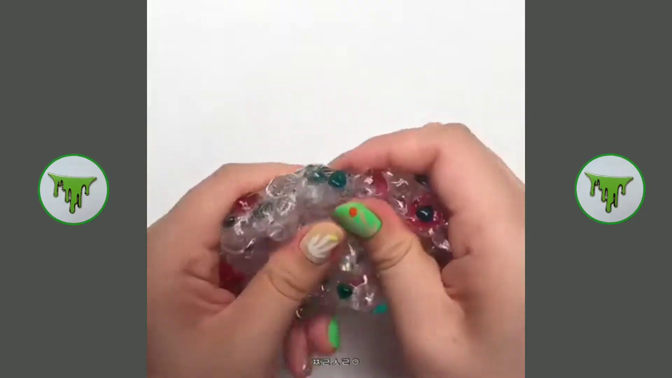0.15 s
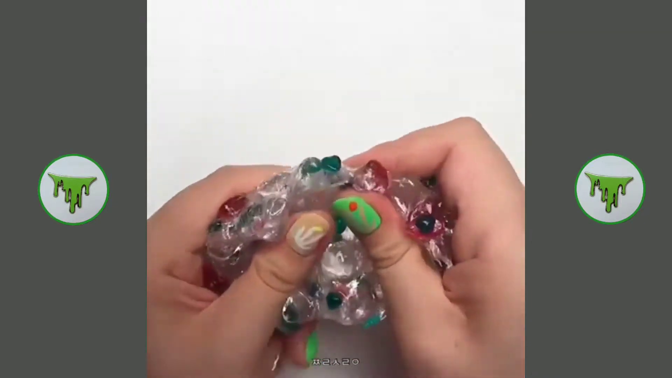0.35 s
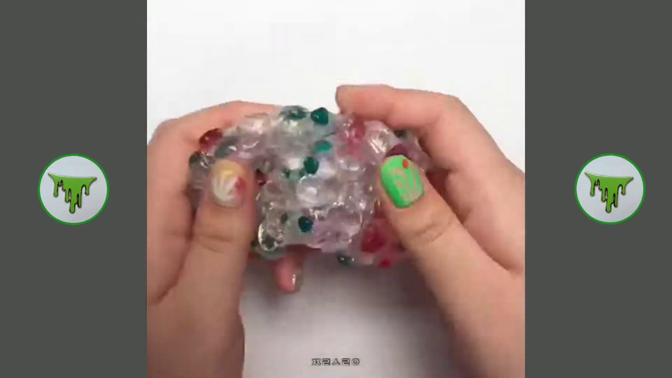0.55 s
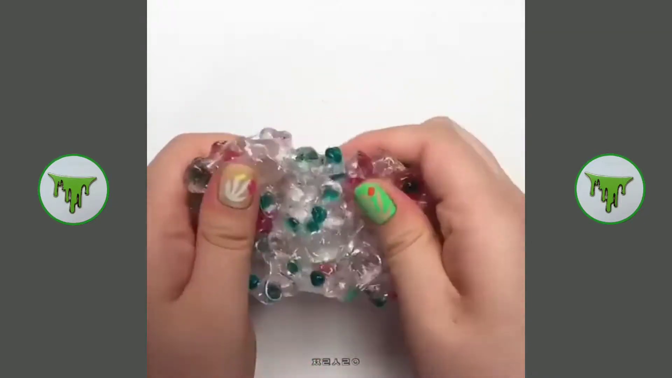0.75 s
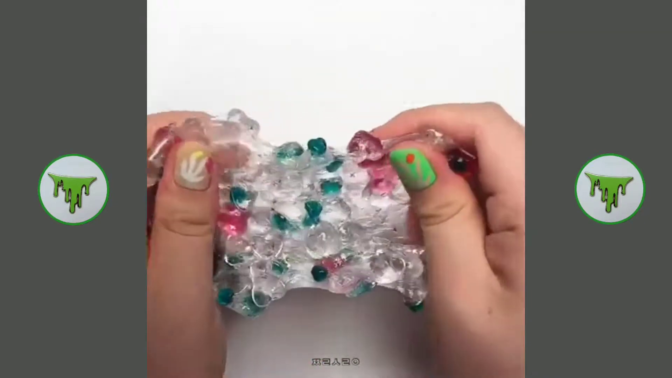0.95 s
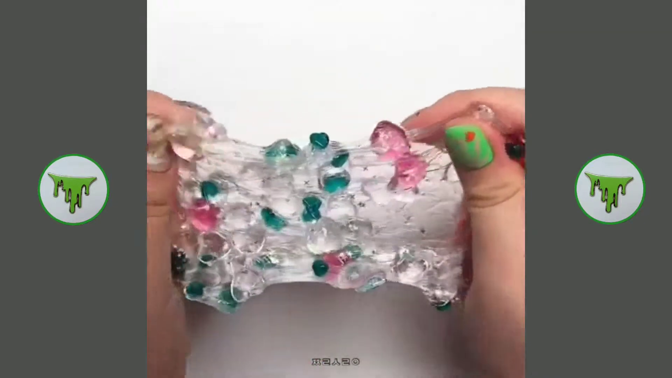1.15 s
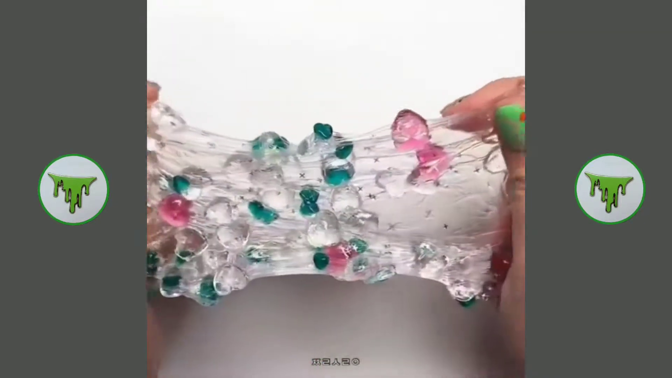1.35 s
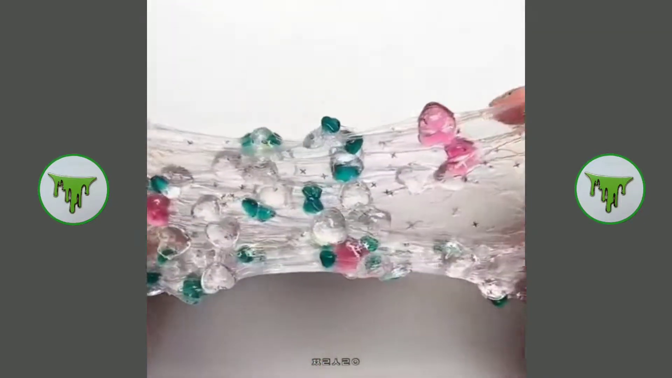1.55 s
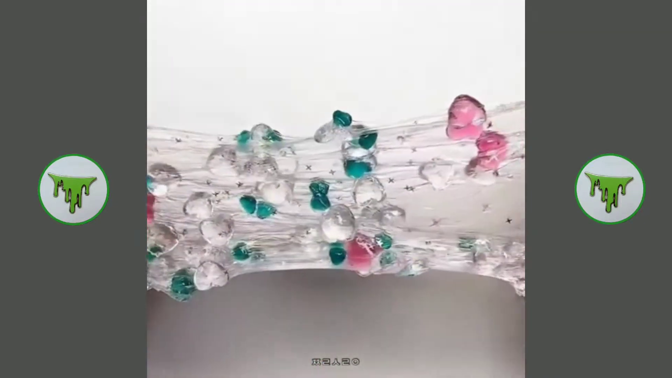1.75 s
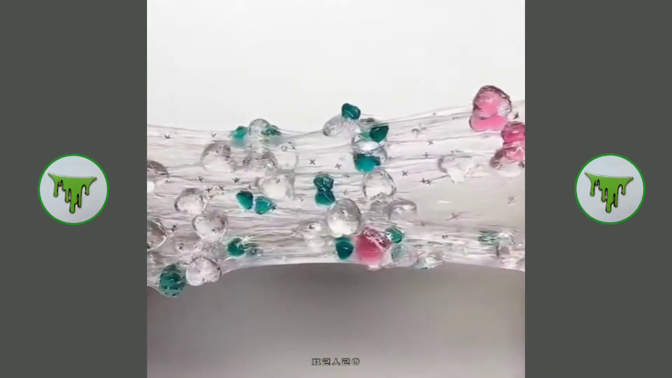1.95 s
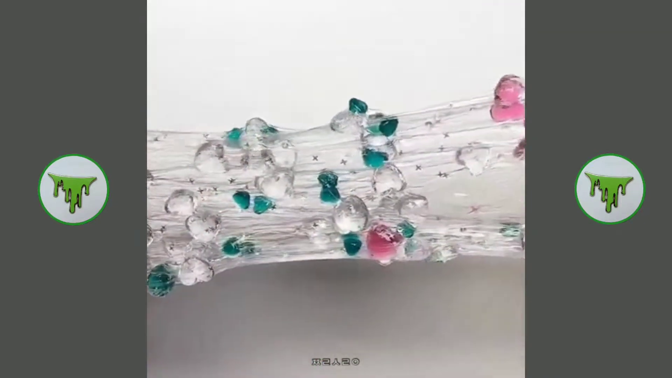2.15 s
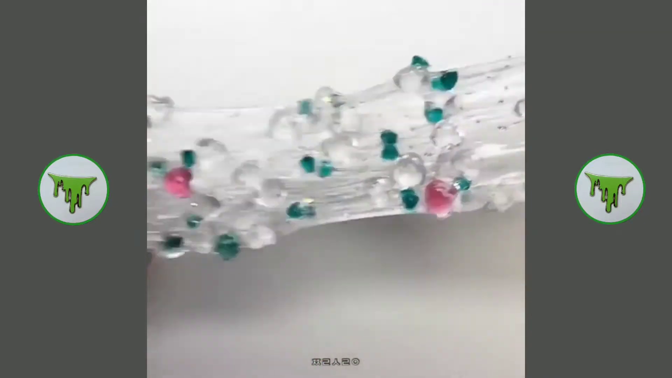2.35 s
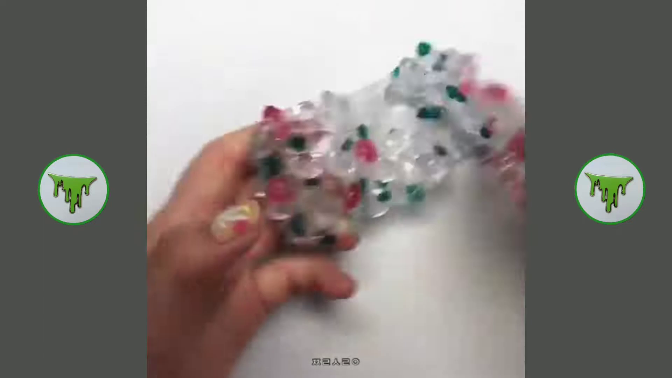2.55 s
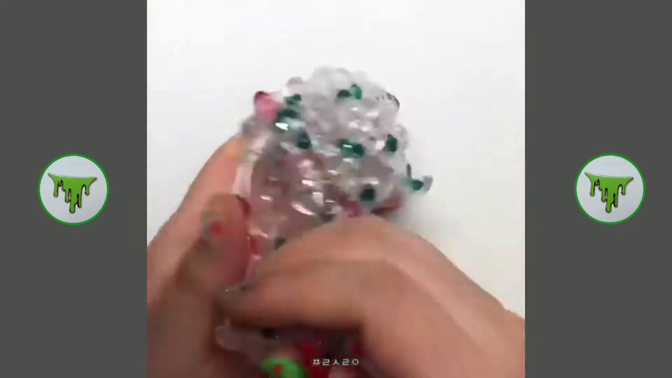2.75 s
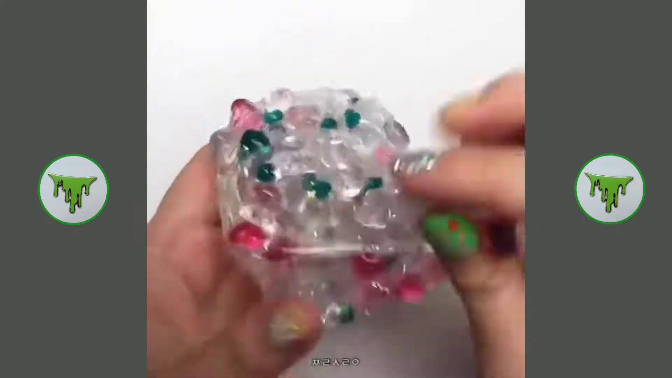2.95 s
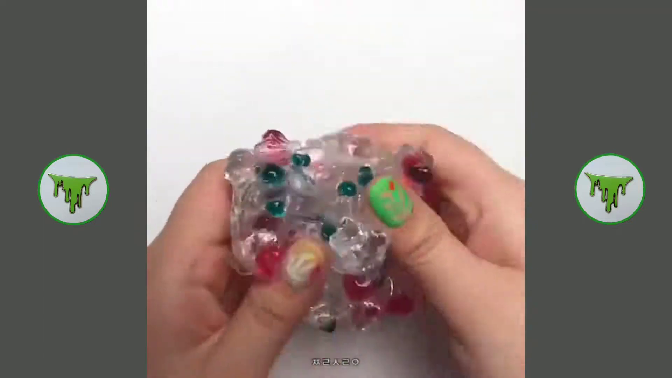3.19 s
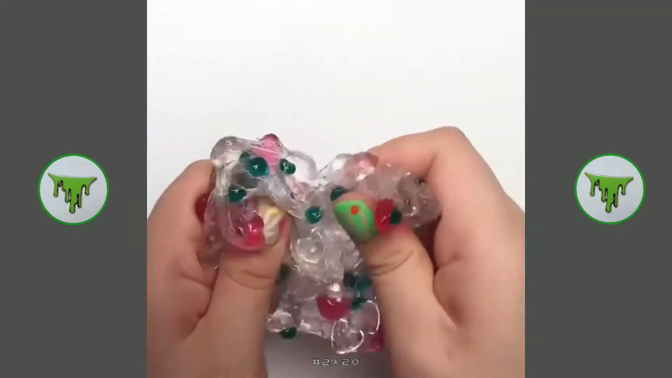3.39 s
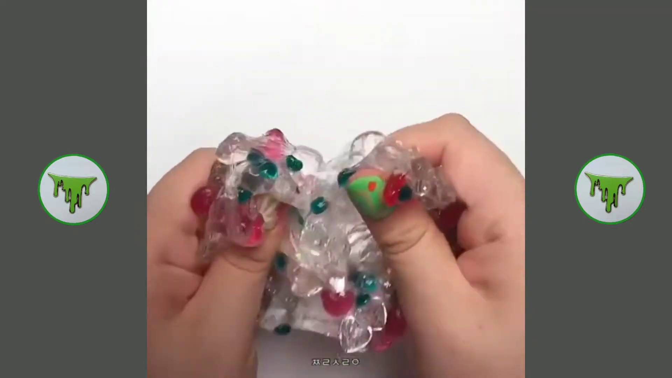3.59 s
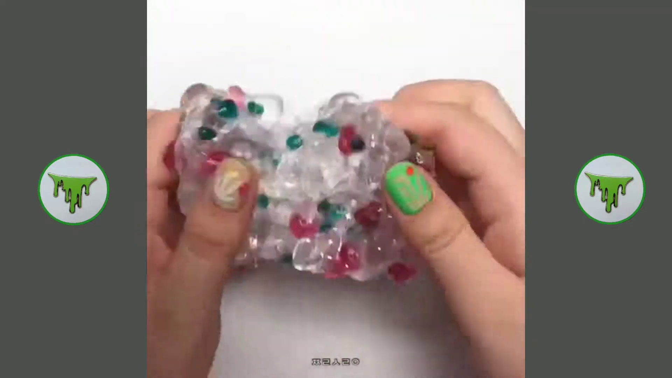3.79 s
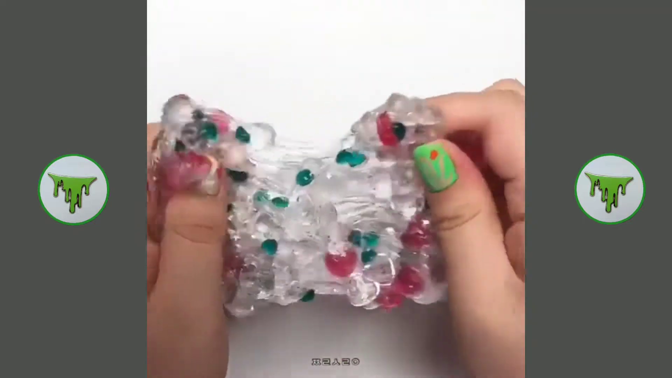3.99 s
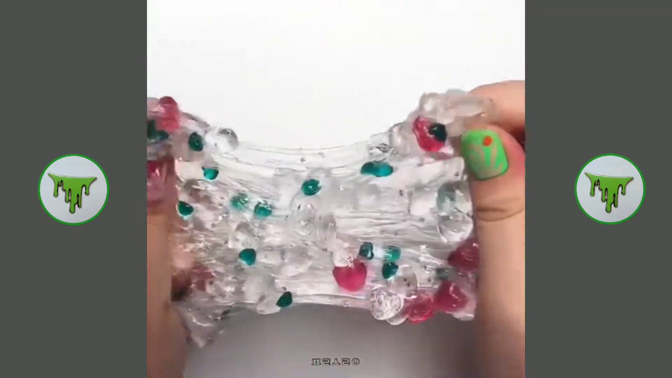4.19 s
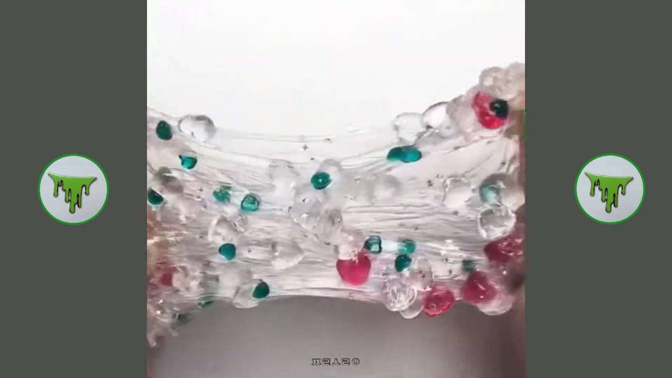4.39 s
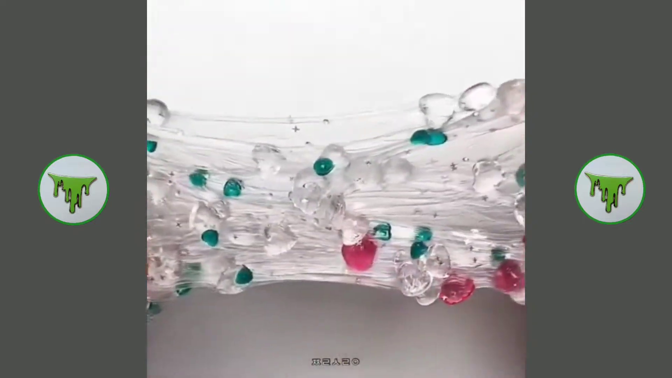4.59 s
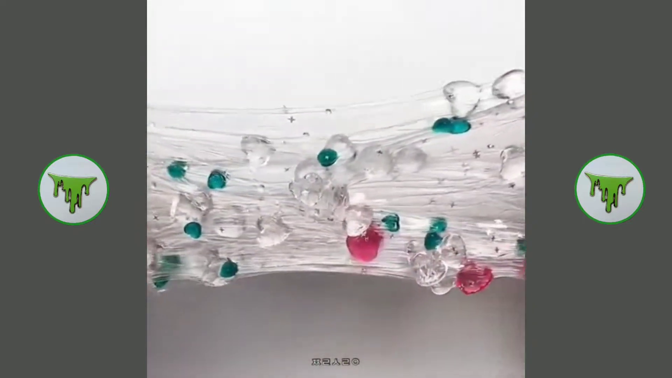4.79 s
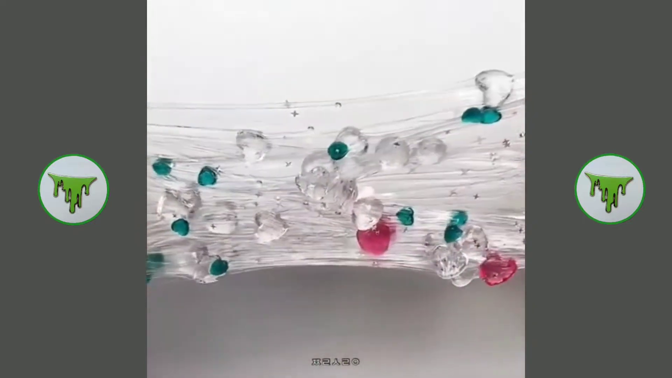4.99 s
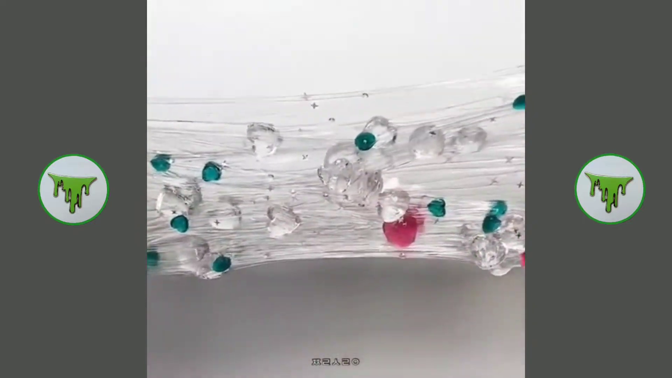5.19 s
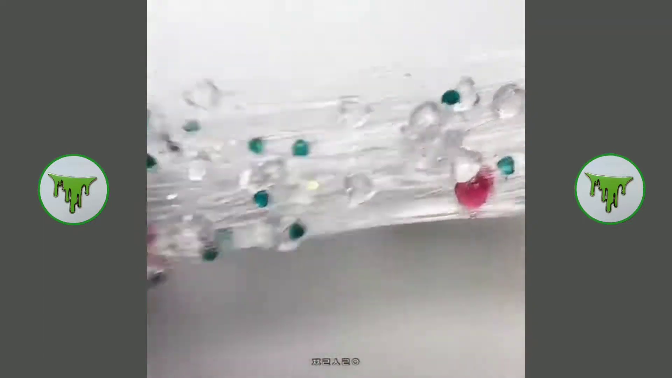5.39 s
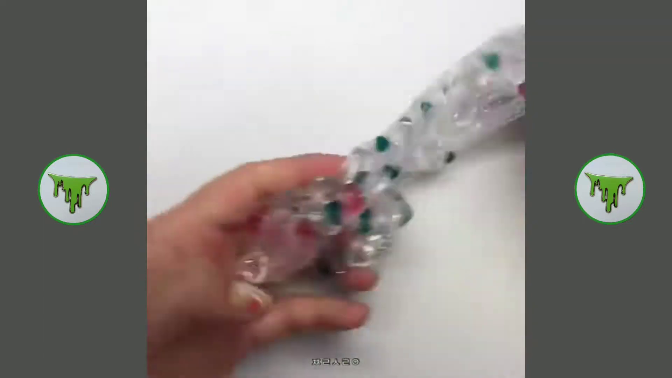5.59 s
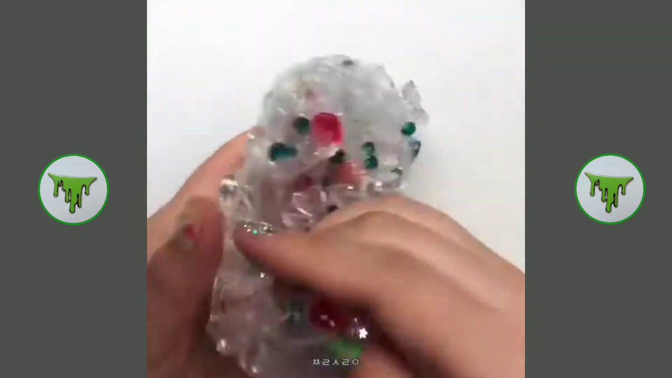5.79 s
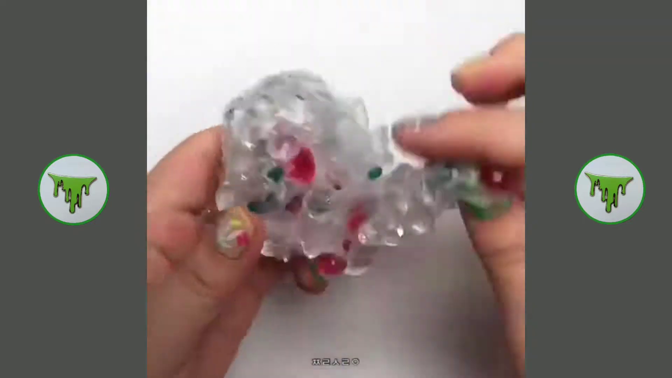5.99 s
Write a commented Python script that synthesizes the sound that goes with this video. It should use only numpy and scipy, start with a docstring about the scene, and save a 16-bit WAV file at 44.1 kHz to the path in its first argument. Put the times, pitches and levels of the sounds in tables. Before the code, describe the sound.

Close wet slime crackling: clusters of crisp, high popping bubbles and squishy fizz, quieter during stretches, then kneaded again, with faint table thumps.

```python
"""Short pitched pops burst out at once, as hands squeeze and stretch wet slime full of gel beads.
Each pop is a few fading tones; between them, coloured noise and swarms of tiny bubbles hiss and crackle.
The lump and the wrists thump the table now and then, which rings in low tones.
Behind it all are short echoes, a faint long room tail near 2 kHz after one burst, made of narrow noise,
and the soft air and hum of a quiet room. A faint, unrelated side layer wavers in the treble."""
import sys
import numpy as np
from scipy import signal
from scipy.fft import rfft, irfft, next_fast_len
from scipy.io import wavfile
from scipy.ndimage import uniform_filter1d, map_coordinates

SR = 44100
rng = np.random.default_rng(int(sys.argv[2]) if len(sys.argv) > 2 else 0)


def master_out(mix):
    """Clip the mix to full scale and print it as 16-bit PCM to the path in sys.argv[1]."""
    frames = np.transpose(np.atleast_2d(mix))
    ceiling = np.clip(frames, -1, 1)
    pcm = np.round(ceiling * 32767).astype(np.int16)
    wavfile.write(sys.argv[1], SR, pcm)


N = 266364  # length in samples, about 6 s


def amp(db):
    """Turn a level in dB into a gain."""
    return 10 ** (np.asarray(db) / 20)


def unit(x):
    """Scale x to an rms of 1."""
    return x / np.sqrt(np.mean(x ** 2) + 1e-20)


def along(points, hz):
    """Read a curve of (Hz, value) points at any frequency, on a log axis."""
    f, v = np.transpose(points)
    return np.interp(np.log(hz + 1), np.log(f + 1), v)


def wobble(rate):
    """A smooth random curve, with `rate` random points a second."""
    knots = rng.standard_normal(int(N * rate / SR) + 4)
    return map_coordinates(knots, [np.arange(N) * rate / SR])


def filtered(x, response):
    """Change the strength of each frequency in x by a response function."""
    m = next_fast_len(N + SR // 2)
    return irfft(rfft(x, m) * response(np.fft.rfftfreq(m, 1 / SR)), m)[..., :N]


def noise(spectrum, patchy_db):
    """Coloured noise of rms 1, with patches of random gain in time and pitch."""
    z = signal.stft(rng.standard_normal(N), nperseg=256)[2]
    field = uniform_filter1d(rng.standard_normal(z.shape), 8, 0)
    field = uniform_filter1d(field, 5, 1)
    white = signal.istft(z * amp(patchy_db * unit(field)), nperseg=256)[1][:N]
    return unit(filtered(white, lambda hz: amp(along(spectrum, hz))))


def rings(s, db, hz, cycles, rise, size):
    """Add up fading tones that swell over about `rise` cycles and lose 60 dB in `cycles`; peak about db."""
    turns = hz[:, None] * np.arange(size) / SR
    swell = (1 - np.exp(-turns / rise)) ** 2
    shape = swell * amp(-60 * turns / np.reshape(cycles, (-1, 1)))
    shape = shape / shape.max(axis=1, keepdims=True)
    at = np.round(s * SR).astype(int)[:, None] + np.arange(size)
    wave = amp(db)[:, None] * shape * np.sin(2 * np.pi * turns)
    return np.bincount(at.ravel(), wave.ravel(), N + SR)[:N]


# Bursting air pockets. Each row: start in seconds, level in dB, pitch of the cavity in Hz,
# low smack in dB and bright snap in dB, these two against the level.
BURSTS = [(.0148,-14.5,3080,-8.5,-30),(.0633,-22,2880,-4,-18),(.101,-18,4600,-8,-7),(.1112,-6,6650,-16,-6),(.122,-8.5,7700,-29,-7),(.1428,-23,1390,0.5,-10),
          (.1514,-8.5,8800,-15.5,-18),(.1636,-4.5,5140,-40,-18),(.174,-16.5,5860,-9,-12),(.1987,-17.5,2630,-2,-33),(.2578,-24,1250,3.5,-7),(.268,-19,6500,-17,-9),(.277,-25,5470,-18,-8),(.353,2.5,5100,-31,-12.5),
          (.4774,-12.5,6050,-32,-30),(.6166,-20,3030,-20.5,-15),(.6278,-35,5000,-28,1),(.6648,-30,5300,-33,-5),(.6869,-33.5,4840,-26,0),(.7152,-24.5,5950,-30,1),(.7259,-28,4680,-16,-12),
          (.7851,4.5,6620,-24,-6.5),(.8235,-6.5,5750,-30,-23),(.8463,-15,5960,-35,-12),(.863,-14,6300,-38.5,-1),(.8752,-24,3100,-18,-12),(.9137,-17,3020,-9,-27),
          (.966,-18.5,3230,-15,-30),(1.0152,-24,7150,-23,-30),(1.0303,-12.5,6240,-34,-19),(1.128,-20,3370,-10,-26),(1.1412,-25,4100,-15,-13),
          (1.1599,-7.5,7360,-31,-14),(1.1722,-20,4140,-33,-23),(1.2166,-22,9100,-28,-28),(1.2444,-28,2220,-14,-15),(1.2496,-26,4000,-20,-19),
          (1.2835,-23,5200,-21,-7),(1.2918,-26.5,3130,-4,-3),(1.3004,-18,5070,-24,-6.5),(1.3274,-14,5700,-40,-13),(1.3504,-30.5,2870,-1.5,-16),(1.4215,-37,7000,-17,-3),(1.431,-34,6740,-18,-10),
          (1.513,-33,6380,-29,-2),(1.5364,-33.5,3030,-9,-14),(1.6512,-35.5,10300,-14,-1),(1.7521,-20,4070,-32,-17),(1.777,-16.5,6280,-19.5,-6.5),
          (1.869,-38,2190,-22,-20),(1.9205,-9.5,8600,-42,-27),(1.9596,-21,5170,-26,-11),(1.9965,-27.5,5300,-35,-8),(2.0103,-39,2050,-8,-25),(2.0816,-20,5670,-42,-19),
          (2.1056,-35,6230,-22,-6),(2.1578,-18.5,5570,-40,-13.5),(2.2451,-29,6200,-33,-32),(2.4142,-21.5,7020,-40,3.5),(2.5086,-28,3130,-40,-6),(2.8537,-26.5,9700,-29,-13),
          (2.9936,-26.5,3560,-13,0),(3.063,-15,2070,-23.5,-13),(3.1617,-10.5,6900,-24.5,-10),(3.1744,-25.5,5030,-25,-6),(3.226,-29.5,4540,-16,-21),
          (3.2379,-16,7400,-22,-20),(3.269,-11.5,5100,-33,-12),(3.28,-10.5,3460,-19,-16),(3.3186,-12.5,7000,-12.5,-27),(3.3653,-18,3330,-7,-31),(3.3953,-7,7560,-28,-14),
          (3.405,-18,6060,-31,-7),(3.4127,-12,6040,-14,-14),(3.4371,-13,5900,-27,-3.5),(3.4844,-16,5500,-11,-12),(3.5236,-13.5,5500,-33,-23.5),(3.5447,-25,2170,-5,0),
          (3.5768,-30,5060,-17,-21),(3.683,-22.5,5000,-4,-8),(3.7378,-24,3170,-19,-22),(3.8084,-27.5,2010,5,-4),(3.812,-21.5,2030,-1,-20),
          (3.8186,-23.5,3200,-21,-18),(3.9065,-26,6600,-20,-3),(3.9182,-23,6000,-14,-10),(3.9276,-22,9260,-9,-7),(3.9605,-19,3530,-14,-10),(3.9762,-11.5,3440,-19,-6.5),
          (4.0133,-15.5,4300,-37,-2),(4.0355,-4,6480,-26,-12),(4.0474,-10.5,3680,-36,-19),(4.0719,-18,4000,-25,-19.5),(4.1182,-25.5,5200,-16,-23),(4.1907,-18,8100,-9,-5.5),
          (4.2394,-24.5,5950,-9,-29),(4.3201,-19,4660,-22,-6),(4.3421,-22.5,2500,-28,-1),(4.3609,-4.5,5740,-23,-17),(4.3784,-26,4060,-8,-26),(4.4265,-24,4000,-25,-30),
          (4.433,-31.5,3280,-6,-11),(4.4694,-23,4500,-34,-9.5),(4.4811,-21.5,5700,-10.5,-20),(4.5028,-30,4280,-18,-14),(4.5921,-20.5,5040,-18.5,-3.5),(4.693,-38,4700,-11,-3),
          (4.7404,-39,1210,-13,-3),(4.7528,-31,6200,-9,-11),(4.7841,-32.5,6660,-16,-4),(4.8557,-37.5,9150,-21,-7),(5.053,-37.5,5140,-12,-17),(5.2525,-42,5100,-2,-3),(5.389,-20,3100,-6.5,-13),(5.5522,-22.5,5000,-31,-32),
          (5.7171,-21.5,5800,-21,-15),(5.7727,-29,2740,-7,-12),(5.8227,-33,5700,-19,-19),(5.9631,-25.5,4870,-11,-7),(6.0102,-30,9230,-15,0)]


def pops():
    """A film snaps, the opened cavity rings on three modes, and the gel gives a low smack."""
    s, db, hz, low_db, bright_db = np.transpose(BURSTS)
    u = rng.uniform(-0.58, 1, (len(s), 5))
    # a wetter burst is more damped
    cavity_cycles = 14 * amp(-.25 * np.maximum(low_db, -18) - 1.5 + u[:, 0])
    cavity = rings(s, db - 5.9, hz, cavity_cycles, rise=1.0, size=800)
    upper_hz = np.minimum(hz * (1.181 + 0.14 * u[:, 1]), 11000)
    upper = rings(s, db - 8.5, upper_hz, 12.6, rise=1.0, size=300)
    lower = rings(s, db - 23.5, hz * (0.675 + .03 * u[:, 1]), 32, rise=0.93, size=300)
    # large pockets and bright films crack hard; a small cavity rings high
    small = hz / 5000
    crack_db = db + 2 - 6 * small + 0.26 * bright_db
    crack = rings(s, crack_db, 5200 * amp(2.3 * u[:, 4]), 8.3, rise=0.74, size=120)
    snap = rings(s, db + bright_db, 9600 * amp(1.2 * u[:, 3]), 8.4, rise=0.82, size=120)
    smack = rings(s, db + low_db, 1400 * amp(1.8 * u[:, 2]), 4, rise=.3, size=300)
    return cavity + upper + lower + crack + snap + smack


def puffs():
    """Bursts blow air at the microphone; doubling their dB lets the hardest, wettest ones stand out."""
    s, db, _, low_db, _ = np.transpose(BURSTS)
    return rings(s, 2 * db + low_db + 1.5, 550 + 0 * s, .9, rise=.1, size=200)


# Pushes and pulls of the fingers. Each row: time of the peak in seconds, peak level in dB,
# rise and fall in seconds for 20 dB, thick gel in dB and thin films in dB, these two against the peak.
SQUELCHES = [(0.005, -36.5, 0.036, 0.14, -1, 2.5), (0.162, -39, 0.2, .2, -8.5, -2),
             (0.3, -40, 0.44, 0.096, 8, 4), (0.476, -36, .07, 0.061, -1, 5),
             (0.571, -49, .15, 0.032, -11, 9), (0.757, -55, 0.081, 0.14, -4, 4),
             (0.829, -38, 0.094, 0.27, -2, 8.5), (0.97, -43, 0.33, .5, 2, -0.5),
             (1.297, -53, .4, 0.15, 4, 7), (1.605, -55.5, 0.12, 0.11, 3, 4.5),
             (1.771, -64, .15, 0.1, 10, 8), (2.407, -38, 0.082, .1, -1, 5),
             (2.576, -51.5, 0.39, 0.056, 7, 6.5), (2.712, -53.5, 0.051, 0.089, -1, 1),
             (2.839, -48.5, 0.071, 0.036, -16, 4.5), (2.913, -53, 0.065, .07, -1.5, -3),
             (3.05, -49, .09, 0.047, -19, 3), (3.285, -33, 0.068, 0.28, -14.5, 1.5),
             (3.487, -34, 0.3, .1, 0, 0.5), (3.697, -38.5, 0.058, 0.092, 1.5, 3),
             (3.813, -44.5, 0.15, 0.029, 10, -0.5), (3.928, -42, 0.03, 0.088, -3, -5),
             (4.045, -43.5, 0.039, 0.56, 0, 2), (4.352, -46, 0.67, 0.062, 2.5, 3.5),
             (4.701, -62.5, 0.074, 0.35, 0, 6), (5.4, -50.5, 0.053, 0.27, 4, 7),
             (5.47, -41, .1, .08, -12, 1.5), (5.616, -43.5, 0.12, 0.043, -4, 2.5),
             (5.719, -57.5, 0.065, 0.043, 3, 6), (5.822, -55, .17, 0.037, 1.5, 2),
             (5.909, -53.5, 0.017, 0.64, -7, -1), (6.035, -48.5, 0.17, .1, 0.5, 9)]
# The stretched slime creeps on between squelches: level in dB, then thick gel and thin films against it.
CREEP_DB, CREEP_THICK_DB, CREEP_THIN_DB = -70, 8.5, 6.5
HOLD_S = 0.011  # each squelch stays at its peak this many seconds on either side


def effort():
    """Gains of the squish, its thick gel and its thin films: squelches add in power over a slow creep."""
    t = np.arange(N) / SR
    power = amp(2 * (CREEP_DB + np.array([[0], [CREEP_THICK_DB], [CREEP_THIN_DB]])))
    for s, db, rise_s, fall_s, thick_db, thin_db in SQUELCHES:
        before = (s - HOLD_S - t) / rise_s
        after = (t - s - HOLD_S) / fall_s
        away = np.maximum(np.maximum(before, after), 0)
        parts = amp(2 * np.array([[0], [thick_db], [thin_db]]))  # 2 * dB gives power
        power = power + parts * amp(2 * (db - 20 * away))
    return np.sqrt(power)


def crackle(pitch_hz, spread_db, cycles, scatter_db, count):
    """Many small bubbles of random pitch, at random times; rare ones are much louder."""
    u, e = rng.uniform(size=count), rng.exponential(size=count)
    hz = np.clip(pitch_hz * amp(spread_db * rng.standard_normal(count)), 300, 11500)
    return unit(rings(u * N / SR, scatter_db * np.minimum(e, 4.5), hz, cycles, rise=0.51, size=500))


# The hiss of tiny films tearing. Each row: frequency in Hz, relative strength in dB per Hz.
TEARING_FILMS = [(350, -7.5), (600, -42), (1150, -2), (1760, -15), (1920, -4), (4570, -1), (8450, -8),
                 (10100, -12.5), (12000, -11), (15600, -49), (22000, -120)]
# The sucking of thick gel. Each row: frequency in Hz, relative strength in dB per Hz.
SUCKING_GEL = [(150, -10.5), (250, 4), (637, -3), (826, 1), (2200, -5), (2390, -8.5), (3000, 1),
               (3900, -23), (6600, -120)]


def squish():
    """Working the slime gives fizz and crackle, and a duller sucking when thick gel moves."""
    level, thick, thin = effort()
    slips = wobble(45)  # the gel gives way in jerks
    fizz = amp(-4.0 + 2.3 * slips + 3.34 * wobble(150)) * noise(TEARING_FILMS, patchy_db=3.0)
    ticks = amp(-6.0 + 1.1 * slips) * crackle(5340, 3.11, cycles=12, scatter_db=4.5, count=6000)
    crisp = fizz + ticks
    # thin films add the sharp top
    top = filtered(crisp, lambda hz: 1 / (1 + (7300 / (hz + 1)) ** 6))
    suck = amp(-11.5 + 2.8 * slips) * noise(SUCKING_GEL, patchy_db=3.0)
    plops = amp(-17.5) * crackle(1490, 3.14, cycles=3.5, scatter_db=3.0, count=600)
    bubbles = amp(-16.0) * crackle(3030, 2.94, cycles=32, scatter_db=5.5, count=500)
    # sticky threads letting go
    snaps = amp(-12.5) * crackle(3800, 2.75, cycles=3.4, scatter_db=2.5, count=420)
    # the square root lets soft pops, and ticks of parting strands, go on in a slow stretch
    gentle = np.sqrt(level)
    hollows = gentle * amp(-39.0) * crackle(900, 1.5, cycles=9, scatter_db=1.8, count=400)
    strands = gentle * amp(-37) * crackle(4470, 4.6, cycles=5.5, scatter_db=2.6, count=500)
    worked = level * (snaps + bubbles + crisp - top)
    return hollows + strands + worked + thin * top + thick * (suck + plops)


# Knocks on the table. Each row: start in seconds, level in dB, hardness in dB added to the upper modes.
KNOCKS = [(0.147, -46.5, -16), (0.477, -47.5, -17), (0.687, -35, -33), (1.1, -54, -7), (2.584, -39, -6),
          (2.639, -38, 3), (2.664, -24.5, -3), (2.719, -38, -5), (2.779, -46, -14), (3.176, -41.5, -14),
          (3.278, -40.5, -5), (3.677, -37.5, -11), (3.839, -48, -3), (5.463, -47, -6), (5.776, -41.5, -11)]
# Tones of the table. Each row: frequency in Hz, relative level in dB, seconds to fade by 60 dB.
TABLE_MODES = [(102.1, -0.5, 0.18), (145, -2, 0.089), (267.2, 0, 0.13), (353, -5, 0.083), (460, -8, 0.18),
               (523, -3.5, 0.042), (830, -18, 0.086)]


def thumps():
    """Each soft blow rings the table; a harder one reaches its upper modes."""
    s, db, hard_db = np.transpose(KNOCKS)
    lean = rng.normal(0, 1.5, (len(s), len(TABLE_MODES)))  # dB, each blow favours other modes
    total = np.zeros(N)
    for k, (hz, level, t60) in enumerate(TABLE_MODES):
        mode_db = db - 1.5 + level + lean[:, k] + hard_db * (hz > 200)
        total += rings(s, mode_db, hz + 0 * s, hz * t60, rise=0.48, size=12000)
    return total


# A faint, long room tail near 2 kHz after one burst: seconds to fade by 60 dB, pitch in Hz,
# width in Hz, level in dB before it flutters.
LONG_TAIL = (0.7, 2120, 300, -51.5)
LONG_TAIL_START_S = 3.066


def long_tail():
    """The room holds on to a narrow band after one burst: fluttering noise that dies away."""
    t60, hz, width_hz, db = LONG_TAIL
    t = np.arange(N) / SR - LONG_TAIL_START_S
    band = noise([(hz - 2 * width_hz, -40), (hz, 0), (hz + 2 * width_hz, -40)], patchy_db=6.5)
    fade_db = db - 60 * np.maximum(t, 0) / t60
    return (t > 0) * amp(fade_db + 2.3 * wobble(50)) * band


# Echo of the table and hands. Each row: frequency in Hz, seconds to fade by 60 dB.
NEAR_ECHO = [(500, 0.051), (3000, 0.022), (6000, 0.024), (11000, 0.017)]
# Echo of the far walls. Each row: frequency in Hz, seconds to fade by 60 dB.
WALL_ECHO = [(800, 0.23), (2200, 0.18), (5000, 0.3), (11000, 0.11)]


def echoed(x, points):
    """x through noise tails whose frequencies die at their own speed, a new tail each quarter second."""
    step, out = SR // 4, np.zeros(N + SR)
    for a in range(0, N, step):
        hz, t, z = signal.stft(rng.standard_normal(step), SR, nperseg=64)
        decay = amp(-60 * t / along(points, hz)[:, None])
        tail = signal.istft(z * decay, SR, nperseg=64)[1][:step]
        wet = signal.fftconvolve(x[a:a + step], tail / np.linalg.norm(tail))
        out[a:a + len(wet)] += wet
    return out[:N]


# Machines far off. Each row: frequency in Hz, relative level in dB.
FAR_HUM = [(58, -61.5), (51, -76)]
# Colour of the room's air noise. Each row: frequency in Hz, relative strength in dB per Hz.
AIR_COLOUR = [(30, -33), (45, -10), (64, -3.5), (103, -1), (250, -1), (530, -7), (900, -14), (1100, -14),
              (2500, -25), (5900, -24), (11300, -25.5), (12500, -50)]
AIR_DB = -59.5  # rms level around which the air noise wavers


def room_tone():
    """Soft air noise over a low hum that wavers in level and phase."""
    t = np.arange(N) / SR
    hum = np.zeros(N)
    for hz, db in FAR_HUM:
        gain = amp(db + 2 + 2.2 * wobble(5.0))
        hum += gain * np.sin(2 * np.pi * hz * t + 0.52 * wobble(6.2))
    return hum + amp(AIR_DB + 0.25 * wobble(5.2)) * noise(AIR_COLOUR, patchy_db=1.3)


def scattered(x):
    """x with its phases shuffled in short frames: similar colour and timing, unrelated waveform."""
    z = signal.stft(x, nperseg=256)[2]
    turned = z * np.exp(2j * np.pi * rng.uniform(size=z.shape))
    return unit(signal.istft(turned, nperseg=256)[1][:N]) * np.std(x)


# A faint, unrelated side layer in the treble. Each row: frequency in Hz,
# gain from the middle to the side in dB before it wavers.
SIDE_TREBLE = [(3000, -49), (3900, -46), (4300, -19), (7000, -12.5), (12000, -14)]


def scene():
    """Every source sits in the middle; a faint treble side layer wavers at random."""
    worked, air = squish(), room_tone()
    slime = pops() + worked + long_tail()
    echoes = amp(-9.5) * echoed(slime, NEAR_ECHO) + amp(-17.5) * echoed(slime, WALL_ECHO)
    mid = slime + echoes + puffs() + thumps() + air  # puffs and thumps have no echo
    layer = filtered(scattered(worked + air), lambda hz: amp(along(SIDE_TREBLE, hz)))
    side = amp(3.4 * wobble(9)) * layer
    return np.array([mid + side, mid - side])


# Treble roll-off of the microphone. Each row: frequency in Hz, gain in dB.
MIC_TREBLE = [(11000, 0.5), (11700, -1.5), (12200, -26.5), (13000, -21)]
TOP_HZ, FULL_SCALE = 13324, .87  # band limit in Hz; amplitude where the input overloads


def record(dry):
    """The loudest pops overload the input; the top treble is lost above the band limit."""
    squeezed = dry / (1 + np.abs(dry / FULL_SCALE) ** 8) ** (1 / 8)
    return filtered(squeezed, lambda hz: amp(along(MIC_TREBLE, hz)) * (hz < TOP_HZ))


dry = scene()
out = record(dry)
master_out(out)
```